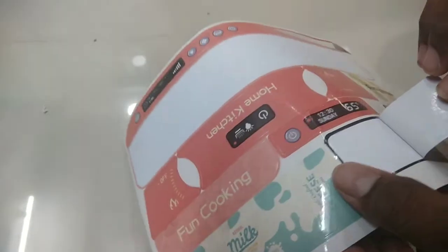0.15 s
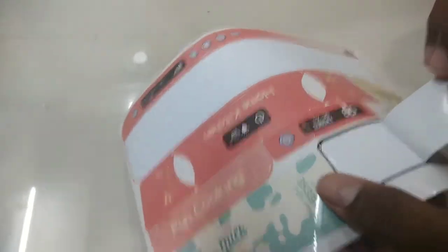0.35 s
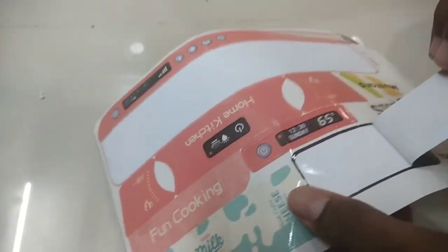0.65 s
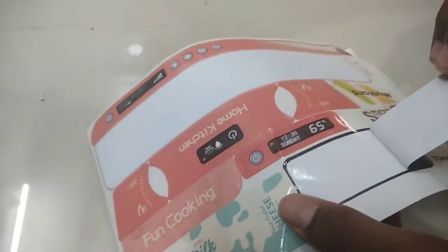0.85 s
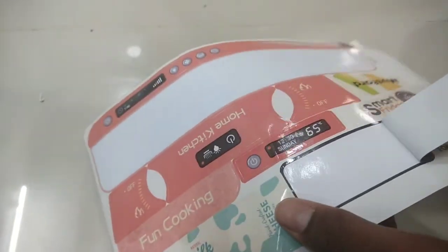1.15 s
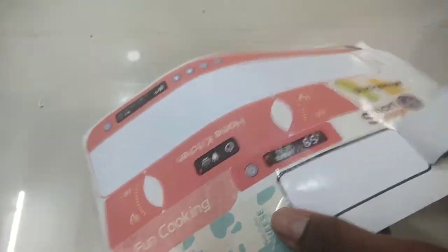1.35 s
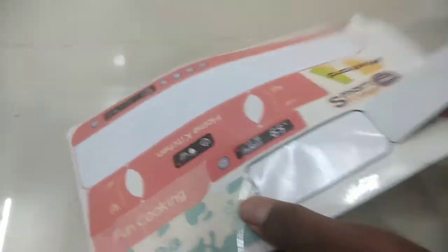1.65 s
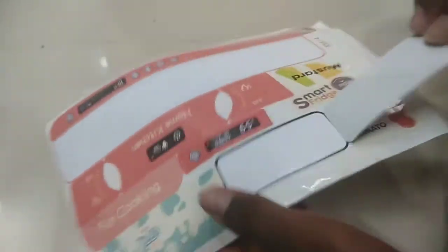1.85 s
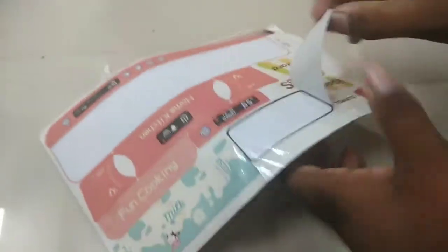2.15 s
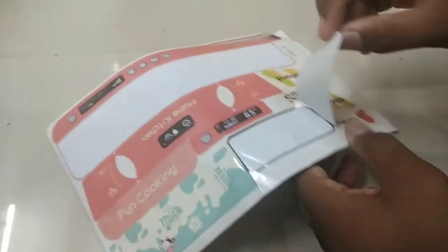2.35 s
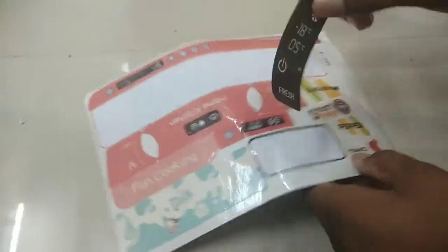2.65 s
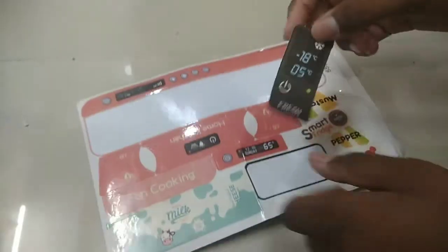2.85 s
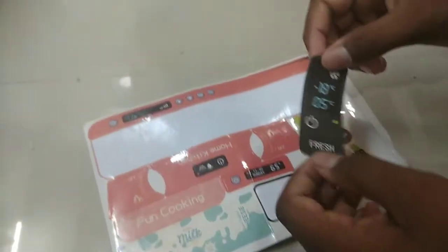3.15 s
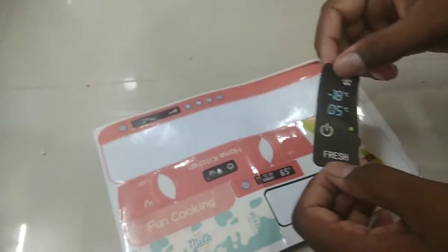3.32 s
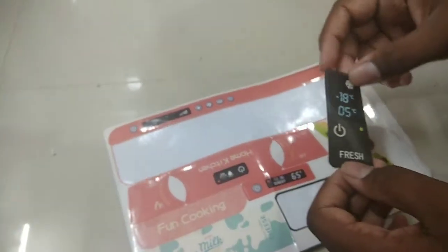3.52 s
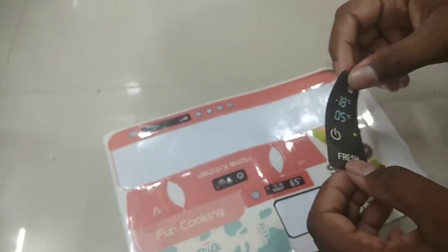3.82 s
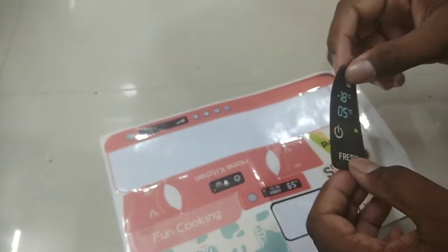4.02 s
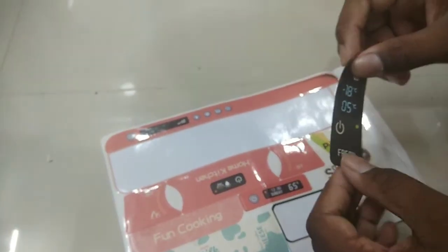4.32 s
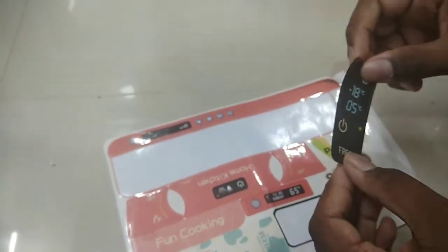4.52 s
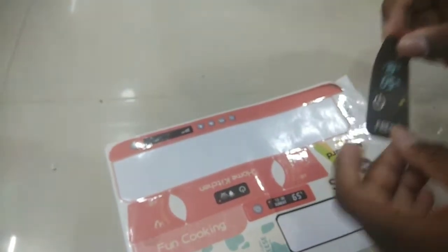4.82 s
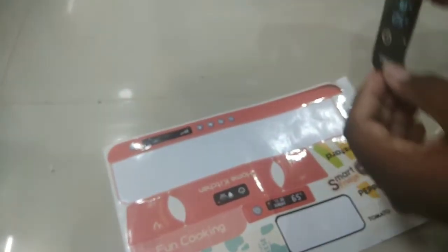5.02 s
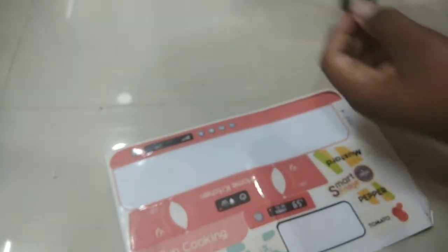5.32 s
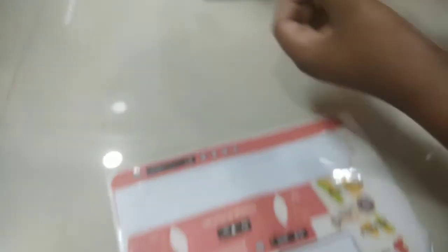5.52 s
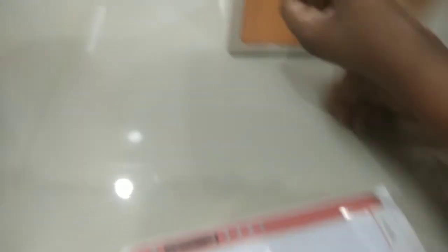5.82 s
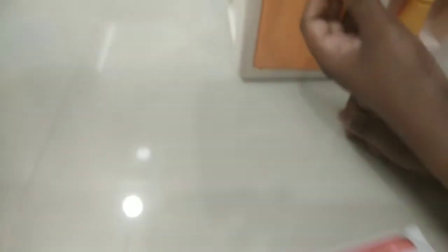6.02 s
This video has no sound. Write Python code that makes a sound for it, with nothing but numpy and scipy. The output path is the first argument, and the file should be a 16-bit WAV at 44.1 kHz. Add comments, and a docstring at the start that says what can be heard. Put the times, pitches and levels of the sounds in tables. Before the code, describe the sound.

Fine, crisp ticking of glue letting go bursts out strongly at once and weakens within a second. Thin plastic snaps, rubs and flexes with two hollow knocks, then peels again in a short cluster of clicks. The later part is quiet, with isolated snaps, barely audible falling squeaks and light rubbing, ending in a hissy slide. Recorded close indoors, with short hard reflections, low ventilation hum and patchy faint hiss.

```python
"""A sticker is peeled off a glossy plastic sheet, close to the microphones in a hard-floored room.
The glue lets go in a fine crackle of tiny ticks; the flexing sheet snaps in noise bursts and knocks in ringing modes.
Dense, fine ticks make the sheet's slides, one of them away over the floor at the end.
A few faint, falling whistles echo off the walls. Farther back lie a low hum of drones, motor and air, and a faint hiss.
"""
import sys
import numpy as np
from scipy import signal
from scipy.fft import rfft, irfft, next_fast_len
from scipy.io import wavfile
from scipy.ndimage import uniform_filter1d

SR = 44100
rng = np.random.default_rng(int(sys.argv[2]) if len(sys.argv) > 2 else 0)


def to_wav(s):
    """Save 16-bit WAV."""
    ch = np.atleast_2d(s).T  # columns
    pcm = np.round(np.clip(ch, -1, 1) * 32767)  # PCM
    wavfile.write(sys.argv[1], SR, pcm.astype(np.int16))


N = 272097
TIME = np.arange(N) / SR  # s

# Levels are relative: a source may add its own gain. Left-right/dB is positive towards the left.
# Colour tables give only the shape of a spectrum: f/Hz, density/dB.

# fingers pull at the sticker or work the film:
# start t/s, end t/s, level/dB, change of level by the end/dB, muffled share (0-1), left-right/dB
PULLS = [(0.0, 0.102, -27.5, -19, 0, 3.5), (0.166, 0.305, -37, -8, 0, -3), (0.296, 0.41, -35.5, 2.5, 0, 0),
         (0.456, 0.54, -31, -2, 0.43, -9), (0.623, 0.812, -35.5, 0, 0.38, 0),
         (2.241, 2.459, -39, -5, 0.4, 0.5), (3.333, 3.533, -49, 7.5, 0.25, -2),
         (5.355, 5.52, -50, -9, 0, -5.5)]
# the film rubs smoothly under the fingers: columns as in PULLS
RUBS = [(0.85, 1.02, -39, -1, 0.39, 2), (1.056, 1.26, -41.5, 4, 0, 1), (2.52, 2.626, -44.5, 8, 0.94, 1.5),
        (4.604, 4.7, -38.5, -6.5, 0.74, 1.5), (4.72, 4.97, -43, -4, 0.53, 6)]
PULL_RISE_S, PULL_FALL_S = 0.0035, 0.049  # a pull sets in at once and lets go more slowly
HOLD_DB = -57.5  # the film rustles faintly even when only held
MUFFLE_HZ = 7500  # fingers lying on the film damp it above this
# colour of the breaking glue: f/Hz, density/dB
CRACKLE_COLOUR = [(1290, -11), (2200, -14), (2800, -3), (4250, -14), (5250, -2), (6300, -3), (7090, 3.5),
                  (10300, 6), (12800, 4), (15500, -2), (16100, -35)]
# ringing modes of the taut film: f/Hz
FILM_MODES = [9850, 10740, 11400, 11640, 12550, 13100]
FILM_RING_S, FILM_RING_DB = 0.005, -16.5  # decay time; level of the ring

# the sheet buckles: t/s, level/dB, decay time of the burst/s, body relative to the crack/dB, left-right/dB
SNAPS = [(0.0055, -39.5, 0.002, -41, 3.5), (0.0113, -26.5, 0.003, -42.5, 4),
         (0.0323, -39.5, 0.0018, -42, 14), (0.073, -35, 0.0014, -45, 2), (0.101, -35.5, 0.0026, -27.5, -1),
         (0.172, -34, 0.0058, -42, -3), (0.1837, -31.5, 0.005, -38, -11), (0.2227, -38, 0.0024, -40, 6),
         (0.2588, -34.5, 0.0013, -12, 7), (0.3, -31.5, 0.0041, -39, -2), (0.323, -29, 0.012, -32, 0.5),
         (0.3463, -29, 0.0053, -30, -1), (0.4253, -23.5, 0.0021, -12, -9.5),
         (0.43, -32.5, 0.0012, -19.5, 6.5), (0.4945, -28, 0.0011, -24, 9.5),
         (0.543, -32.5, 0.0015, -32.5, -0.5), (0.5738, -36, 0.0024, -12, 0.5),
         (0.6438, -38, 0.0015, -27.5, 8), (0.6937, -34, 0.0047, -20, -3.5),
         (0.8002, -36.5, 0.0036, -29, -2), (1.2409, -19, 0.0019, -16.5, -0.5),
         (1.2435, -20.5, 0.0011, -15, -5.5), (1.9034, -44.5, 0.0052, 0, -5),
         (2.2688, -23.5, 0.0033, -14, -2), (2.2722, -33.5, 0.003, -7.5, -11),
         (2.284, -30.5, 0.0013, -18, -6.5), (2.292, -30, 0.003, -2, -5.5), (2.375, -32, 0.0023, 1, -3),
         (2.684, -42, 0.012, -27, -11.5), (3.352, -36.5, 0.0012, -13, -0.5),
         (3.4913, -24.5, 0.0014, -18, -2.5), (3.889, -43.5, 0.0025, -24.5, 0),
         (4.6091, -39, 0.0035, -7, 5.5), (4.709, -41, 0.004, -30, -4), (5.208, -47, 0.008, -23, -5)]
# a snap's bright crack: f/Hz, density/dB
SNAP_COLOUR = [(1500, -35.5), (3200, -25), (5000, -7.5), (6500, -1.5), (8000, -1.5), (9500, 3.5),
               (11500, 2.5), (13500, 1.5), (15500, -10), (16200, -44)]
# the sheet's body under the crack: f/Hz, density/dB
BODY_COLOUR = [(50, -24.5), (200, 7.5), (600, -22), (1200, 7), (2600, 8.5), (4300, 7), (6000, 4),
               (10000, -101)]

# dull knocks of the bending sheet: t/s, level/dB, pitch f/Hz, rattle level/dB
KNOCKS = [(1.631, -27, 1040, -6), (1.7011, -35.5, 940, -3), (2.6080, -32, 1390, 4)]
# ringing modes of the whole sheet: f/Hz, level/dB
SHEET_MODES = [(791, 4), (1126, -14), (1195, -9), (1382, 7), (1830, 1)]
SHEET_T60_S = 0.083
KNOCK_ROOM_DB = -9.5  # the knocks hang on in the room

# the sheet slides: start t/s, end t/s, level/dB, share of the way at which it is fastest, left-right/dB
SLIDES = [(1.366, 1.67, -43.5, 0.86, 2), (1.92, 2.139, -39, 0.75, 4.5), (5.545, 5.697, -39, 0.44, -3.5),
          (5.674, 6.099, -38.5, 0.56, -1.5)]
# colour of the sliding plastic: f/Hz, density/dB
SLIDE_COLOUR = [(2060, -53), (4720, -15.5), (5200, 1), (8100, 5), (10400, 10), (13000, 8.5), (15600, 1.5),
                (16000, -21)]
SLIDE_RISE_S, SLIDE_FALL_S, SLIDE_ENDS_DB = 0.028, 0.088, -7.5  # a slide is slower at its ends

# faint squeaks: start t/s, length t/s, pitch f/Hz, share by which the pitch sinks,
# pitch jitter f/Hz, level/dB, left-right/dB
SQUEAKS = [(3.563, 0.33, 2900, 0.0064, 29.8, -64.5, 15), (3.741, 0.13, 4020, 0.15, 70, -58, 11.5),
           (4.187, 0.11, 4350, 0.18, 75, -57, 19.5), (4.328, 0.11, 5666, 0.22, 199.7, -51, -2)]
SQUEAK_PEAK_AT = 0.66  # share of a squeak before it is loudest
SQUEAK_DIRECT_DB = -0.5

# the hands move the sheet and waft air: t/s, half length t/s, level/dB, left-right/dB
WAFTS = [(0.323, 0.2, -55, 19), (1.6, 0.2, -56, -14.5), (3.156, 0.035, -54, -5), (4.882, 0.092, -51, 27.5),
         (6.07, 0.106, -57, -2.5)]
# colour of the wafted air: f/Hz, density/dB
HANDLING_COLOUR = [(20, -38), (90, -8), (140, 5), (250, -9.5), (2000, -80)]
STIR_DB = -62  # air stirred between the wafts

# decay of the hard-floored room: f/Hz, t60/s
ROOM = [(200, 0.53), (4000, 0.5), (8000, 0.18), (15000, 0.29)]

# two low drones of the ventilation: f/Hz, width f/Hz, level/dB, drift/(dB per s), left-right/dB
DRONES = [(201.2, 17.4, -48.5, -1.1, -6), (276, 22, -58, -3, -4.5)]
MOTOR_HZ, MOTOR_DB = 201.1, -48
# colour of the room's air noise: f/Hz, density/dB
AIR = [(25, -41), (60, -44.5), (120, -14), (165, 1.5), (240, -3), (380, -17.5), (520, -16), (900, -18),
       (1300, -18), (1900, -18), (2600, -22.5), (3500, -30.5), (6000, -66)]
AIR_DB, AIR_WAVER_DB = -47, 0.6
# the noise suppressor briefly turns the low hum down: t/s
DIPS = [1.87, 2.6, 5.5]
DIP_S, DIP_DEPTH = 0.042, 0.41  # half length; share of drones and motor that is lost
# the noise suppressor lets a narrow band of fan noise through in brief patches:
# t/s, half length t/s, pitch f/Hz, level/dB
FAN_PATCHES = [(0.268, 0.064, 773, -54.5), (0.698, 0.038, 806, -50), (0.944, 0.058, 754, -54.5),
               (1.393, 0.097, 773, -51.5), (2.598, 0.3, 746, -53.5), (3.696, 0.017, 793, -55.5),
               (3.967, 0.047, 756, -52), (4.238, 0.049, 740, -53.5), (5.64, 0.054, 755, -54.5)]
FAN_WIDTH_HZ, FAN_REST_DB, FAN_WAVER_DB = 117, -57, 4

# colour of the wash of hiss: f/Hz, density/dB
HISS = [(2500, -3), (3300, 4.5), (8000, 4), (16000, -6)]
# broad, steady bands in the hiss: f/Hz, width f/Hz, level/dB, left-right/dB
HISS_BANDS = [(1262, 220, -61, -14), (2544, 230, -57.5, 22), (5457, 320, -60.5, 23.5),
              (6900, 430, -64, 11.5)]
HISS_PATCHY_DB = 2
# likeness of background noise at the two microphones: f/Hz, likeness (0-1)
SAME = [(40, 0.35), (150, 0.92), (300, 0.75), (750, 0.53), (2000, 0.048)]

# noise suppressor: f/Hz, deepest cut/dB
SUPPRESSION = [(150, 7), (700, 12.5), (4000, 15.5)]
EDGE_HZ = 16400  # upper band limit


def peel():
    """Threads of glue break in uneven clumps, thicker ones tick apart; rubbing is finer and even."""
    fine = ticks(number=12600, spread_db=2.5, ring_s=0.0009)
    coarse = ticks(number=560, spread_db=3.5, ring_s=0.0006)
    clumps = gain_of(3.6 * flutter(knots_per_s=190) + 2 * flutter(knots_per_s=60))
    breaks = (fine + 0.9 * coarse) * clumps
    crackle = gain_of(-5.5) * coloured(evened(breaks), CRACKLE_COLOUR)
    grain = gain_of(-4.0) * coloured(fine, CRACKLE_COLOUR)
    held = gain_of(HOLD_DB) * grain * panned(2.5)
    return worked(crackle, PULLS) + worked(grain, RUBS) + held


def ticks(number, spread_db, ring_s, patches=24):
    """Tiny fractures of random size, each ringing one of many patches of film."""
    at = rng.integers(0, N, number)
    size = gain_of(spread_db * np.minimum(rng.exponential(1, number), 3))
    t = np.arange(128) / SR
    rings = rng.standard_normal((2, patches, len(t))) * np.exp(-t / ring_s)
    grains = rings[:, rng.integers(0, patches, number)] * size[:, None]
    places = (at[:, None] + np.arange(len(t))).ravel()
    return evened(np.array([np.bincount(places, side.ravel(), N)[:N] for side in grains]))


def worked(texture, strokes):
    """Plays a texture under each hand movement, damped where fingers lie on the film."""
    lowpass = signal.butter(2, MUFFLE_HZ, fs=SR, output="sos")
    damped = signal.sosfiltfilt(lowpass, texture)
    out = np.zeros((2, N))
    for start, end, db, ease_db, muffled, side_db in strokes:
        level = gain_of(np.interp(TIME, [start, end], [db, db + ease_db]))
        force = level * stroke(start, end, PULL_RISE_S, PULL_FALL_S)
        touched = texture + muffled * (damped - texture)
        out += force * touched * panned(side_db)
    return out


def film(x):
    """The taut film adds its thin, high ring to whatever excites it."""
    t = np.arange(2048) / SR
    ring = sum(np.sin(2 * np.pi * hz * t) for hz in FILM_MODES) * np.exp(-t / FILM_RING_S)
    ring /= np.linalg.norm(ring)
    return x + gain_of(FILM_RING_DB) * signal.fftconvolve(x, ring[None], axes=1)[:, :N]


def snaps():
    """The sheet buckles: a burst of noise with a short, soft lead-in; gives its crack and body."""
    crack, body = np.zeros((2, N)), np.zeros((2, N))
    t = np.arange(-200, 700) / SR  # the lead-in comes before 0
    for s, db, length, body_db, side_db in SNAPS:
        uneven_db = 2.8 * evened(uniform_filter1d(rng.standard_normal(len(t)), size=16))
        noise = rng.standard_normal((2, len(t))) * gain_of(uneven_db)
        lead_in = 0.42 * np.exp(-abs(t) / 0.002)
        decay = np.exp(-abs(t) / length)
        burst = noise * np.where(t < 0, lead_in, decay)
        burst /= np.linalg.norm(burst, axis=1, keepdims=True)
        burst *= gain_of(db) * panned(side_db)
        add(crack, s + t[0], burst)
        add(body, s + t[0], burst * gain_of(body_db))
    return gain_of(25.0) * coloured(crack, SNAP_COLOUR), gain_of(19.5) * coloured(body, BODY_COLOUR)


def knocks():
    """The bowed sheet flips over: one or two slow cycles, a short rattle, then its modes ring out."""
    out, t = np.zeros((2, N)), np.arange(8192) / SR
    for s, db, hz, rattle_db in KNOCKS:
        flip = np.sin(2 * np.pi * hz * t) * np.exp(-t / 0.0011)
        rattle = coloured(rng.standard_normal((2, len(t))) * np.exp(-t / 0.0034), BODY_COLOUR)
        ring = np.zeros((2, len(t)))
        for f, level in SHEET_MODES:
            phase = rng.random((2, 1))  # in turns
            ring += gain_of(level - 60 * t / SHEET_T60_S) * np.sin(2 * np.pi * (f * t + phase))
        knock = flip + 0.45 * gain_of(rattle_db) * rattle + gain_of(-22.0) * ring
        add(out, s, gain_of(db + 7.5) * knock * panned(-0.64))
    # the knocks sound only between about 500 Hz and 3.7 kHz
    return signal.sosfilt(signal.butter(4, [500, 3700], "bandpass", fs=SR, output="sos"), out)


def slides():
    """Smooth plastic rubs along: a dense, finely grained hiss that grows with speed."""
    rub = ticks(number=35000, spread_db=2.5, ring_s=0.0005) * gain_of(0.9 * flutter(knots_per_s=60))
    speed = np.zeros((2, N))
    for start, end, db, fastest, side_db in SLIDES:
        from_peak = np.interp((TIME - start) / (end - start), [0, fastest, 1], [-1, 0, 1])
        level = gain_of(db + SLIDE_ENDS_DB * from_peak ** 2)
        speed += level * stroke(start, end, SLIDE_RISE_S, SLIDE_FALL_S) * panned(side_db)
    return gain_of(-5.5) * speed * coloured(rub, SLIDE_COLOUR)


def squeaks():
    """Short, fuzzy whistles that glide down and hang on in the room."""
    out = np.zeros((2, N))
    for start, length, hz, sag, jitter_hz, db, side_db in SQUEAKS:
        t = np.arange(0, length, 1 / SR)
        pitch = hz * (1 - sag * t / length) + jitter_hz * flutter(knots_per_s=640)[:len(t)]
        pressure = np.interp(t / length, [0, SQUEAK_PEAK_AT, 1], [0, 1, 0])
        whistle = np.sin(2 * np.pi * np.cumsum(pitch) / SR)
        add(out, start, gain_of(db) * np.sqrt(pressure) * whistle * panned(side_db))
    echo = room(out)
    return gain_of(SQUEAK_DIRECT_DB) * out + gain_of(-2) * echo + gain_of(-11) * room(echo)


def handling():
    """The sheet wafts air as the hands move: low noise that swells and sinks."""
    wafts = sum(gain_of(db) * swell(s, half) * panned(side_db) for s, half, db, side_db in WAFTS)
    air = gain_of(STIR_DB) + wafts
    return gain_of(7.5) * air * coloured(diffuse(), HANDLING_COLOUR, size=8192)


def bounce(x, share=0.17):
    """One very near reflection, 0.6 ms late and inverted, combs the spectrum."""
    delay = round(0.000645 * SR)
    return x - share * np.pad(x, ((0, 0), (delay, 0)))[:, :N]


def room(x):
    """Sparse random reflections off hard walls, decaying at a rate set for each frequency."""
    sparse = rng.random((2, SR)) < 4000 / SR
    taps = rng.standard_normal((2, SR)) * sparse * (TIME[:SR] > 0.005)
    hz, t, z = signal.stft(taps, SR, nperseg=256)
    decay = gain_of(-60 * t / read(ROOM, hz)[:, None])
    tail = signal.istft(z * decay, SR, nperseg=256)[1]
    tail /= np.linalg.norm(tail, axis=1, keepdims=True)
    return signal.fftconvolve(1.7 * x + 0.13 * x[::-1], tail, axes=1)[:, :N]


def hum():
    """Low background: a wavering motor tone, broad air noise, two slowly sinking drones and fan noise."""
    drones = np.zeros((2, N))
    for hz, width, db, drift, side_db in DRONES:
        pitch = hz + 0.5 * width * flutter(knots_per_s=7)
        tone = resonate(diffuse(), pitch, 0.5 * width)
        drones += gain_of(db) * evened(gain_of(drift * TIME)) * tone * panned(side_db)
    motor = evened(np.sin(2 * np.pi * MOTOR_HZ * TIME + 0.5 * flutter(knots_per_s=4)))
    motor = gain_of(MOTOR_DB + 2 * flutter(knots_per_s=8.2)) * motor
    air = gain_of(AIR_DB + AIR_WAVER_DB * flutter(knots_per_s=6)) * coloured(diffuse(), AIR, size=8192)
    dips = 1 - DIP_DEPTH * sum(swell(s, DIP_S) for s in DIPS)
    return dips * (drones + motor) + np.sqrt(dips) * air + fan_patches()  # the air dips less


def fan_patches():
    """A narrow, wavering band of fan noise, let through in brief patches of slightly different pitch."""
    rest = gain_of(FAN_REST_DB + FAN_WAVER_DB * flutter(knots_per_s=10))
    strength = rest + sum(gain_of(db) * swell(s, half) for s, half, _, db in FAN_PATCHES)
    times, _, hz, _ = np.transpose(FAN_PATCHES)
    return strength * resonate(diffuse(), np.interp(TIME, times, hz), FAN_WIDTH_HZ)


def hiss():
    """Faint hiss: a few steady, broad bands over a wash that flickers in small patches."""
    bands = sum(gain_of(db) * resonate(diffuse(), hz, width) * panned(side_db)
                for hz, width, db, side_db in HISS_BANDS)
    z = signal.stft(gain_of(-55.5) * coloured(diffuse(), HISS), nperseg=512)[2]
    patches = uniform_filter1d(rng.standard_normal(z.shape[1:]), size=3, axis=0)  # across frequency
    patches = uniform_filter1d(patches, size=40, axis=1)  # along time
    wash = signal.istft(z * gain_of(HISS_PATCHY_DB * evened(patches)), nperseg=512)[1][:, :N]
    return bands + wash


def diffuse():
    """White noise at two microphones, alike in the bass and nearly unrelated in the treble."""
    size = next_fast_len(N, real=True)
    a, b = rfft(rng.standard_normal((2, size)))
    same = np.clip(read(SAME, np.fft.rfftfreq(size, 1 / SR)), -1, 1)
    return irfft(np.array([a, same * a + np.sqrt(1 - same ** 2) * b]), size)[:, :N]


def suppress(x, open_db=9):
    """Noise suppressor: bins near their own quiet level are turned down, leaving a blotchy background."""
    hz, _, z = signal.stft(x, SR, nperseg=512, noverlap=384)
    power = uniform_filter1d(np.mean(abs(z) ** 2, axis=0), size=7, axis=1)
    power_db = 10 * np.log10(abs(power) + 1e-20)
    quiet_db = np.percentile(power_db, 15, axis=1, keepdims=True)
    closed = np.clip(1 - (power_db - quiet_db) / open_db, 0, 1)
    cut_db = read(SUPPRESSION, hz)[:, None] * closed
    return signal.istft(z * gain_of(-cut_db), SR, nperseg=512, noverlap=384)[1][:, :N]


def gain_of(db):
    """Decibels to amplitude."""
    return 10 ** (np.asarray(db) / 20)


def evened(x):
    """Scales to rms 1."""
    return x / np.sqrt(np.mean(x ** 2) + 1e-20)


def read(points, hz):
    """Reads a frequency table on a log-frequency axis."""
    f, value = np.transpose(points)
    return np.interp(np.log(hz + 1), np.log(f + 1), value)


def panned(db):
    """Left and right gains of constant power."""
    gains = gain_of(np.array([[0.5], [-0.5]]) * db)
    return gains / np.sqrt(np.mean(gains ** 2, axis=0))


def add(mix, s, sound):
    """Mixes a stereo sound in at time s."""
    part = mix[:, max(round(s * SR), 0):][:, :sound.shape[1]]
    part += sound[:, :part.shape[1]]


def coloured(x, points, size=2048):
    """Causal, minimum-phase filter of unit energy with the given spectrum."""
    hz = abs(np.fft.fftfreq(size, 1 / SR))
    log_gain = np.log(gain_of(np.maximum(read(points, hz), -100)))
    taps = np.fft.ifft(np.exp(np.conj(signal.hilbert(log_gain)))).real[:size // 2]
    taps /= np.linalg.norm(taps)
    return signal.fftconvolve(x, taps[None], axes=1)[:, :x.shape[1]]


def resonate(x, hz, width):
    """A steep resonance that can follow a moving pitch."""
    turn = np.exp(2j * np.pi * np.cumsum(hz * np.ones(x.shape[-1])) / SR)
    r = np.exp(-np.pi * width / SR)
    # shift the pitch down to 0 Hz, smooth, shift back up
    smooth = signal.lfilter([(1 - r) ** 2], [1, -2 * r, r * r], x / turn)
    return evened((turn * smooth).real)


def flutter(knots_per_s):
    """Random wavering of rms 1: straight lines between random knots."""
    knots = rng.standard_normal(N)
    return evened(np.interp(TIME * knots_per_s, np.arange(N), knots))


def stroke(start, end, rise_s, fall_s):
    """Gain of one hand movement: it sets in, holds and dies away."""
    return np.exp(-np.maximum(start - TIME, 0) / rise_s - np.maximum(TIME - end, 0) / fall_s)


def swell(s, half_length):
    """Bell-shaped curve that rises smoothly to 1 at time s and sinks again."""
    return np.exp(-((TIME - s) / half_length) ** 2)


def scene():
    """The sheet close by, its reflections, the hum of the room and a faint hiss."""
    rustle = film(peel() + slides())
    cracks, body = snaps()
    cracks = film(cracks)
    bumps = knocks()
    to_room = gain_of(-6.0) * rustle + gain_of(-14.0) * cracks + gain_of(-7.0) * body
    echoes = room(to_room + gain_of(KNOCK_ROOM_DB) * bumps)
    sheet = bounce(rustle + cracks + body + echoes) + bumps
    return sheet + squeaks() + handling() + hum() + hiss()


def record(dry):
    """The recorder's noise suppressor and upper band limit."""
    lowpass = signal.firwin(255, EDGE_HZ, window=("kaiser", 9), fs=SR)
    return signal.oaconvolve(suppress(dry), lowpass[None], "same")


dry = scene()
out = record(dry)
to_wav(out)
```